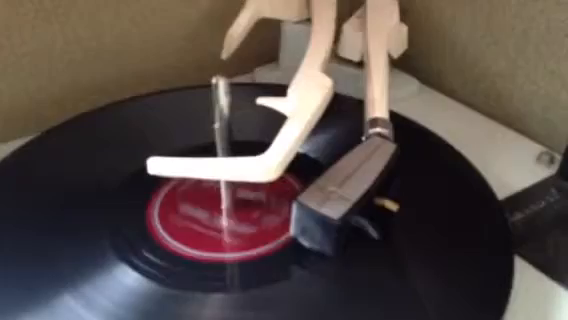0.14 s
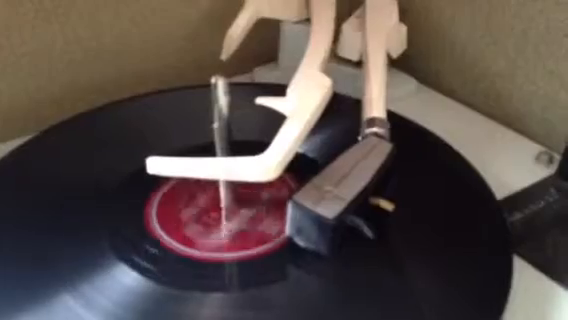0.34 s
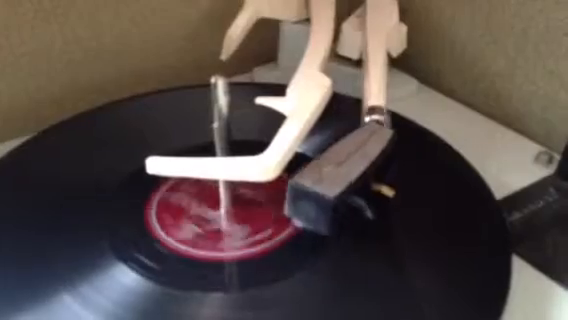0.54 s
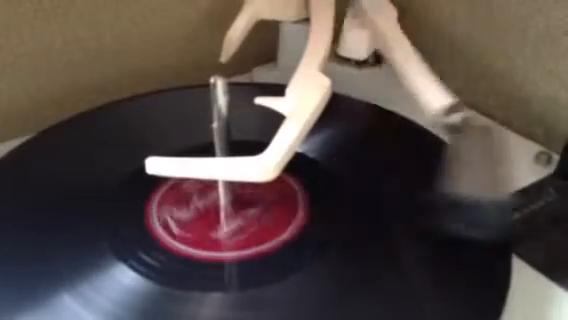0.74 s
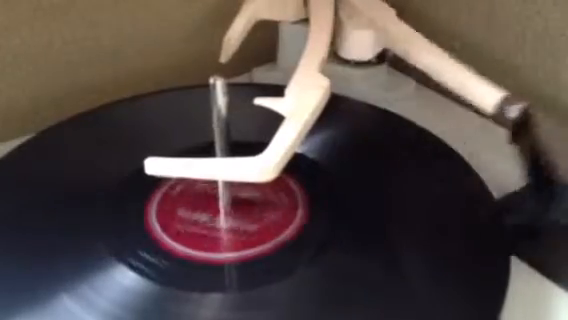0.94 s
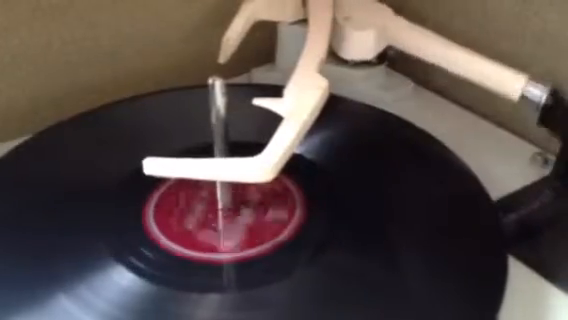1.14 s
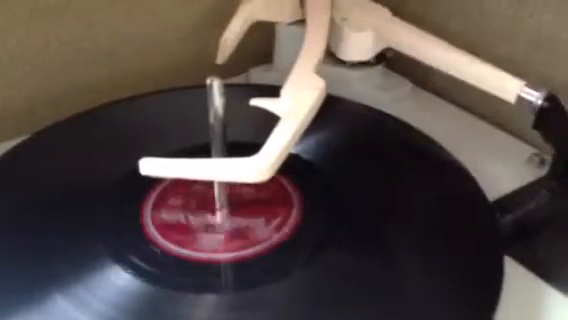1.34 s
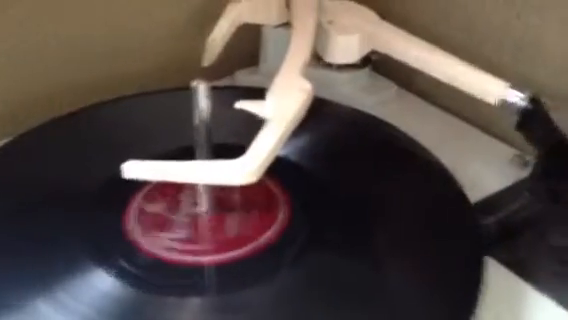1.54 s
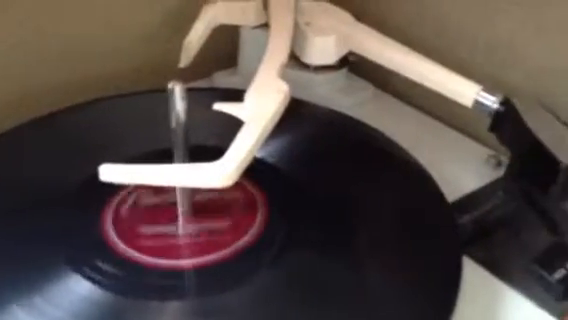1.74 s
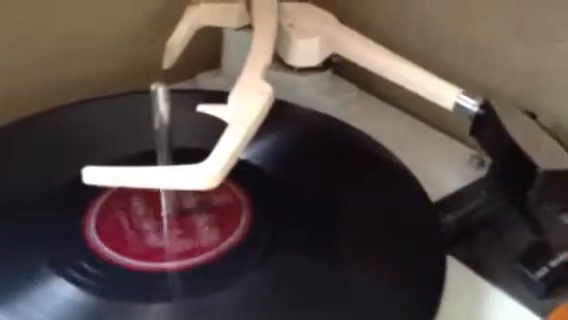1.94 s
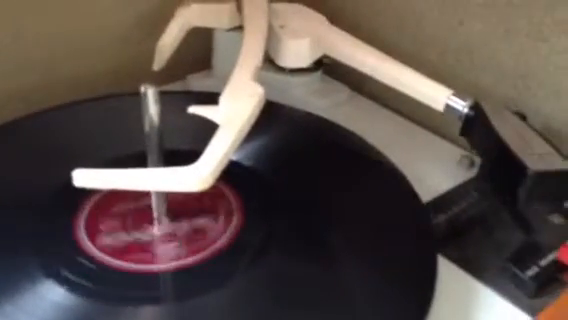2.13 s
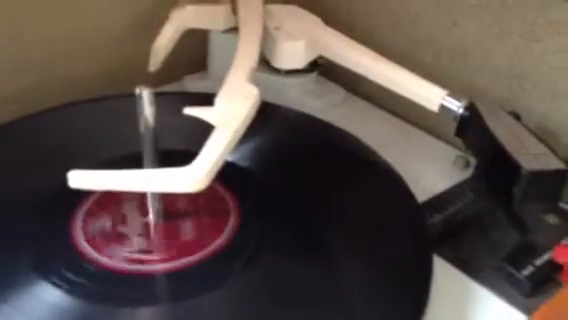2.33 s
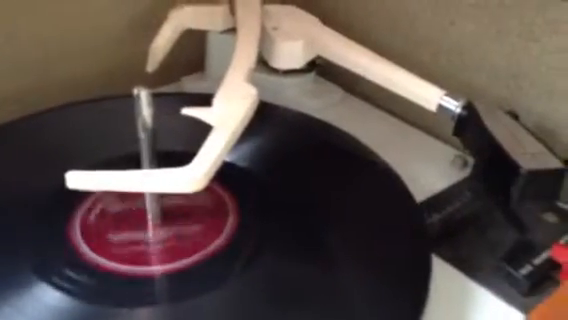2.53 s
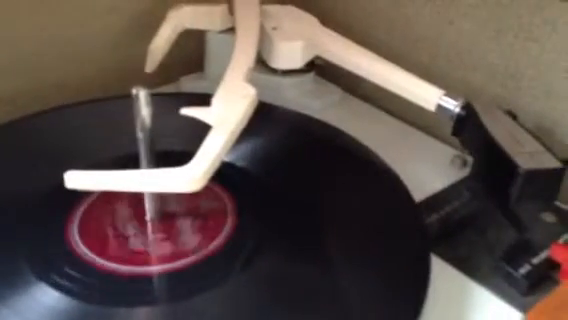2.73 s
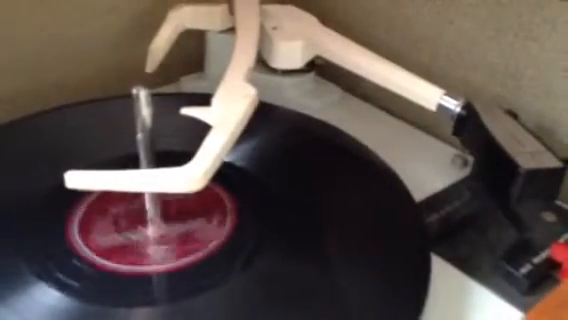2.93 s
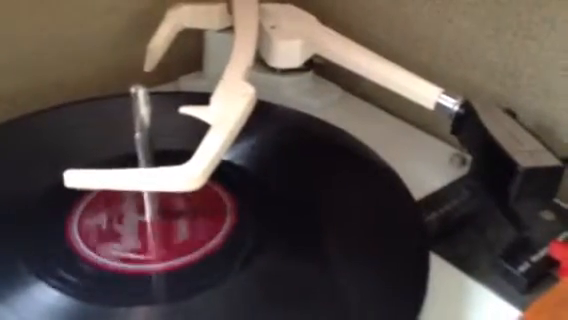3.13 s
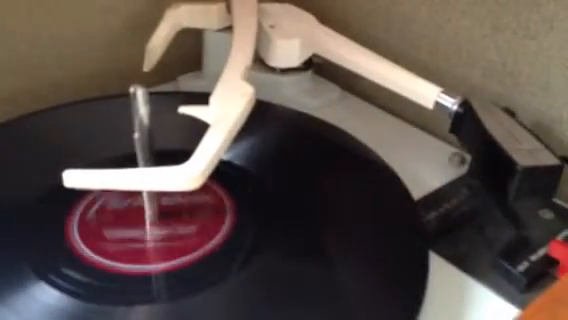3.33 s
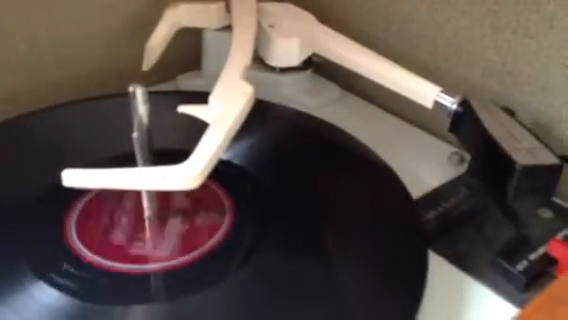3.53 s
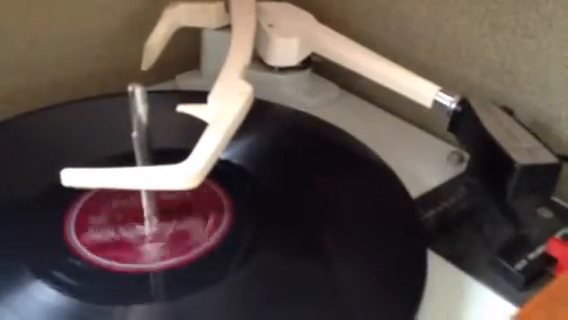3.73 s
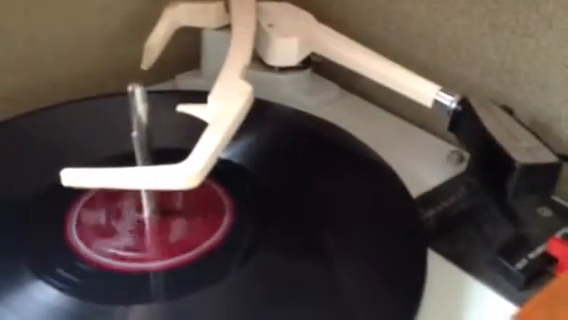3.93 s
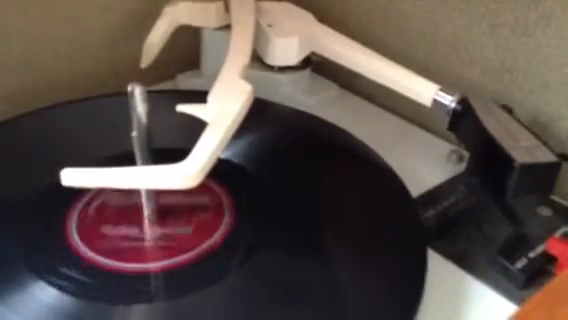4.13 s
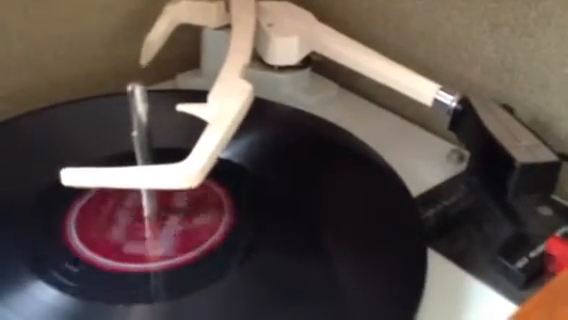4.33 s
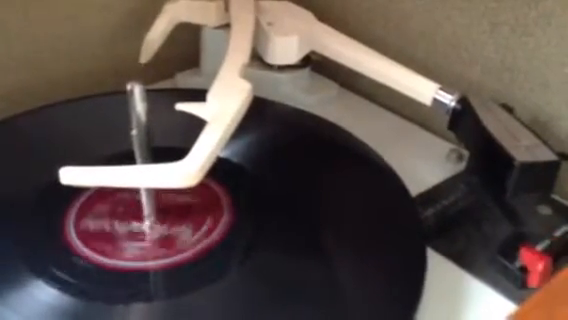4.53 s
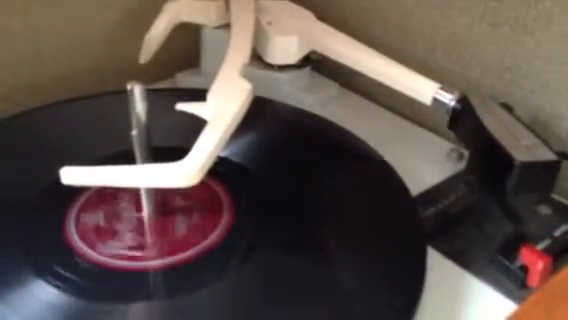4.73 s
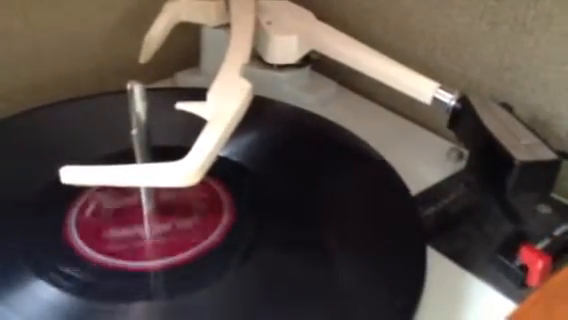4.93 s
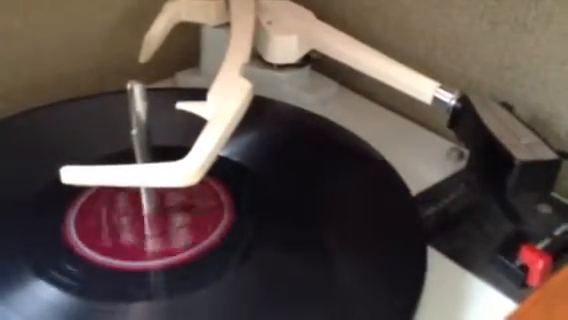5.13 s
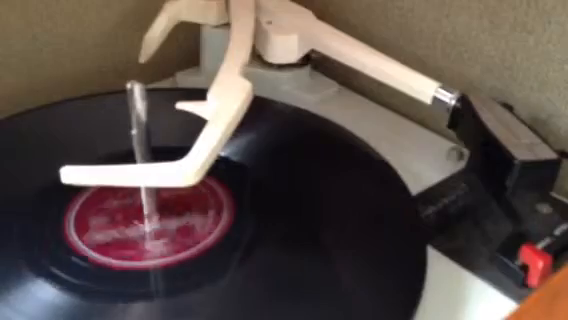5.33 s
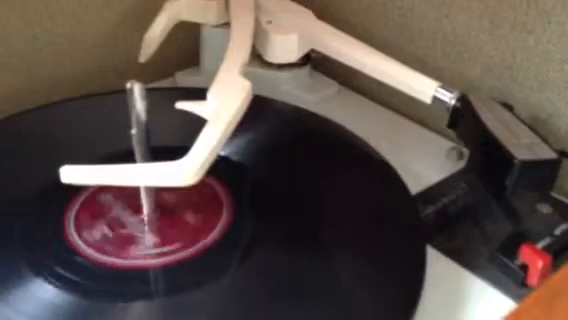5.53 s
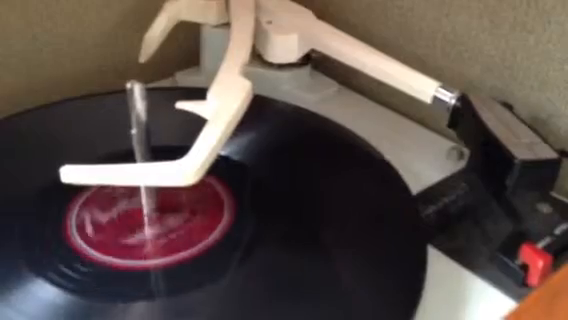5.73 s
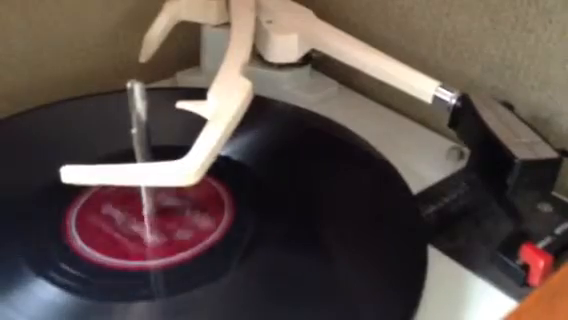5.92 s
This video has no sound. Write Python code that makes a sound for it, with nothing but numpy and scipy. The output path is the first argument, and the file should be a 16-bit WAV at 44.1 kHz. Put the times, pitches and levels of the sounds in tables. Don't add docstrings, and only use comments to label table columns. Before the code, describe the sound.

Heard from a close microphone with short, dry indoor reverberation: metal levers clunk and snap early on, with scraping linkage rattles just after one second. A long quiet stretch of rapid little gear ticks, dull thuds and motor whirr follows. Then a bright, heavy multiple clack, a rattling tail, and the platter coasting almost silently with soft rim brushes.

```python
import sys
import numpy as np
from scipy import signal
from scipy.fft import rfft, irfft
from scipy.io import wavfile
from scipy.ndimage import uniform_filter1d

SR = 44100
rng = np.random.default_rng(int(sys.argv[2]) if len(sys.argv) > 2 else 0)


def volts_from_db(level):
    exponent = np.asarray(level, float) / 20
    return 10 ** exponent


def materialize(psi):
    bounded = np.clip(np.atleast_2d(psi).T, -1, 1)
    quanta = np.round(bounded * 32767).astype(np.int16)
    wavfile.write(sys.argv[1], SR, quanta)


N = 267543
DRIVE_OFF_S = 4.5


def evened(x):
    return x / np.sqrt(np.mean(x ** 2) + 1e-20)


def read(points, hz):
    f, value = np.transpose(points)
    return np.interp(np.log(hz + 1), np.log(f + 1), value)


def bump(hz, centre_hz, octaves):
    return np.exp(-(np.log2((hz + 1) / centre_hz) / octaves) ** 2)


def bell(centre_s, width_s):
    return np.exp(-((np.arange(N) / SR - centre_s) / width_s) ** 2)


def slow(size):
    return evened(uniform_filter1d(uniform_filter1d(rng.standard_normal(N), size), size))


def add(mix, s, sound):
    part = mix[round(s * SR):][:len(sound)]
    part += sound[:len(part)]


def coloured(noise, colour_db):
    hz = np.fft.rfftfreq(len(noise), 1 / SR)
    return evened(irfft(rfft(noise) * volts_from_db(colour_db(hz)), len(noise)))


def resonate(x, hz, width):
    r = np.exp(-np.pi * width / SR)
    return 2 * signal.lfilter([1 - r], [1, -r * np.exp(2j * np.pi * hz / SR)], x).real


def narrow_band(noise, hz, width):
    return evened(resonate(resonate(noise, hz, width), hz, width))


def fuzzy(notes):
    noise = rng.standard_normal(N)
    return sum(volts_from_db(db) * narrow_band(noise, hz, width) for hz, width, db in notes)


def blow(size, db, colour_db, t60, rise_s):
    noise = rng.standard_normal(size)
    t = np.arange(size) / SR
    crack = 1 + 0.22 * np.exp(-t / 0.0023)
    grain = volts_from_db(2 * evened(uniform_filter1d(noise[::-1], 40)))
    envelope = volts_from_db(db - 60 * t / t60) * (1 - np.exp(-t / rise_s))
    return envelope * crack * grain * coloured(noise, colour_db)


# f/Hz, level/dB
KNOCK_COLOUR = [(25, -60.5), (60, -32.5), (200, -14.5), (350, -7.5), (900, 1), (1300, -3.5), (2500, -0.5),
                (4000, -0.5), (6000, 3.5), (8000, 1.5), (12000, 0), (15200, 0)]
# f/Hz, level/dB
BODY = [(700, -3), (1300, -22), (3000, -62)]
MIDDLE = [(500, -40), (1100, 1), (3800, 1.5), (6500, -12), (11000, -34.5)]
EDGE = [(2500, -47.5), (5000, -5.5), (6500, -3), (8200, -3), (11500, -1.5), (15000, -3.5)]
# t/s, peak level/dB, body level/dB re peak, edge level/dB re peak, struck part f/Hz
CLUNKS = [(0.1105, -30.5, -13, 3, 4080), (0.1553, -30.5, -6, -14, 1680), (0.242, -40, -7.5, -21, 2400),
          (0.358, -34, -11, -25, 3420), (0.39, -40.5, -34, -5.5, 6510), (0.721, -31, -16, -27, 1950),
          (0.8006, -37, -12.5, -17, 1830), (1.1074, -27.5, -9.5, -13, 1120),
          (1.2242, -22, -12.5, 1.7, 1576), (1.3489, -25.5, -15, -3.5, 4800), (1.3779, -29, -17, -9, 4850),
          (1.6373, -42, -5.5, -12.5, 2270), (2.677, -38, -9, -3, 2380), (3.8419, -37, -36, -3.5, 1888),
          (4.0217, -40, -17.5, -14, 2416), (4.4874, -18, -12, 2, 2750), (4.5175, -12, -12, 2, 2480),
          (4.5245, -16, -20.5, 2, 3960), (4.6348, -32, -9, -1.5, 5600)]
# t/s, peak level/dB, body level/dB re peak, edge level/dB re peak, struck part f/Hz
SNAPS = [
    (0.8268, -9.5, -38, -11, 3660),
    (0.8325, -18, -15.5, -4, 2370),
    (1.235, -30, -13, -11, 1200),
    (1.2652, -15.5, -19, -12, 3220),
    (1.3944, -36, -5.5, -3, 3950),
    (2.0322, -27.5, -13, -14.5, 3620),
    (2.039, -37.5, -29.5, -19, 1876),
    (4.5411, -20, -11, -10, 3422),
]
# t/s, peak level/dB, body level/dB re peak, edge level/dB re peak, struck part f/Hz
RATTLES = [
    (1.2025, -45, 4.5, -26, 1120),
    (1.2584, -16.5, -18.5, -6, 4262),
    (3.8655, -37.5, -38, -15, 3640),
    (4.5335, -20, -12.5, 6, 2440),
]
# t/s, peak level/dB, edge level/dB re peak, struck part f/Hz
TAPS = [(0.1057, -42.5, -3, 3750), (0.2187, -47.5, -7.5, 3640), (0.3291, -51, -10, 4400),
        (1.2775, -35, -25, 2400), (1.634, -46, -25, 2310), (1.5131, -55.5, -30, 2400),
        (1.5884, -48.5, -24.5, 3250), (1.644, -56.5, -13, 2280), (1.9703, -56.5, -17, 2444),
        (3.931, -49, -6.5, 2370), (3.9746, -51, -31, 2270), (4.3216, -50, -23.5, 3340),
        (4.3683, -56.5, -0.5, 1570), (4.4266, -48.5, -26, 2280), (4.4655, -60.5, 0, 2920),
        (4.4778, -45.5, -17, 3200)]


def levers():
    out = np.zeros(N)
    knocks = []
    for rows, t60 in ((CLUNKS, 0.078), (SNAPS, 0.036), (RATTLES, 0.11)):
        knocks += [row + (t60,) for row in rows]
    knocks += [(s, db, -6.5, edge_db, hz, 0.082) for s, db, edge_db, hz in TAPS]

    def body(hz):
        return read(KNOCK_COLOUR, hz) + read(BODY, hz)

    def edge(hz):
        return read(KNOCK_COLOUR, hz) + read(EDGE, hz)

    for s, db, body_db, edge_db, part_hz, t60 in knocks:
        def middle(hz):
            return read(KNOCK_COLOUR, hz) + 9 * bump(hz, part_hz, 0.098) + read(MIDDLE, hz)

        add(out, s, blow(8192, db, middle, 0.77 * t60, 0.0012))
        add(out, s, blow(8192, db + body_db - 0.5, body, 1.3 * t60, 0.0036))
        add(out, s, blow(8192, db + edge_db + 5.5, edge, 0.51 * t60, 0.0015))
    return out


# t/s, peak level/dB, centre f/Hz
TICKS = [(.3895, -32.5, 7400), (1.2240, -23, 9500), (1.2590, -15, 5000), (1.2662, -22, 3500),
         (1.3490, -26, 6000), (1.3782, -23.5, 6000), (1.3943, -37, 6000), (1.2028, -39, 1200),
         (2.0325, -29.5, 3700), (4.4880, -15, 8700), (4.5195, -7, 14000), (4.5415, -11, 11000),
         (3.9725, -52, 3200), (1.2612, -8, 3800), (1.1078, -26, 2300), (4.4895, -11, 3200),
         (.7215, -30, 2500), (.1115, -24, 5000), (.1575, -29, 2400), (2.678, -46, 1000)]


def ticks():
    out = np.zeros(N)
    for s, db, centre_hz in TICKS:
        add(out, s, blow(2048, db - 7.5, lambda hz: 30 * bump(hz, centre_hz, 1.3), 0.018, 0.0003))
    return out


# start t/s, end t/s, start level/dB, end level/dB, spread/octaves
SCRAPES = [(0.308, 0.356, -80, -57, 2.5), (0.832, 0.99, -35.5, -72.5, 2.16), (1.215, 1.227, -49, -36, 1.8),
           (1.235, 1.261, -42, -25, 2.45), (1.27, 1.347, -39, -50.5, 2.46), (1.396, 1.473, -53, -68, 2.7),
           (1.11, 1.2, -51, -71, 2), (4.502, 4.521, -31, -22.5, 4.7), (3.84, 3.896, -42, -43.5, 1.92),
           (3.887, 3.92, -46, -58, 2), (4.488, 4.526, -21.5, -27.5, 2.9), (4.543, 4.636, -25.5, -43.5, 4.1),
           (4.636, 4.805, -42, -86.5, 2.9), (4.658, 5.266, -71, -83, 1.7)]


def scrapes():
    out = np.zeros(N)
    for start, end, start_db, end_db, octaves in SCRAPES:
        size = round((end - start) * SR)
        n = np.arange(size)
        centre_hz = 2400 * 2 ** (0.32 * max(octaves - 2, 0))
        noise, jumps = rng.standard_normal((2, SR))
        grip = volts_from_db(1.6 * evened(uniform_filter1d(jumps, 60)))
        chatter = grip * coloured(noise, lambda hz: 30 * bump(hz, centre_hz, octaves))
        rise = np.minimum(n / (0.003 * SR), 1)
        fall = np.minimum(n[::-1] / (0.09 * size), 1)
        add(out, start, chatter[:size] * volts_from_db(np.linspace(start_db, end_db, size)) * rise * fall)
    return out


# t/s, peak level/dB, f/Hz
TEETH = [(0.53, -48.5, 1500), (0.5992, -47, 2750), (0.644, -53.5, 2530), (0.685, -49, 1620),
         (0.765, -44, 2530), (0.939, -45, 2410), (0.9783, -48, 2950), (1.022, -52, 1096),
         (1.449, -48.5, 2280), (1.556, -52, 2405), (1.687, -52, 2290), (1.737, -55.5, 1190),
         (1.8392, -56.5, 1052), (2.3468, -53.5, 1453), (2.4984, -54, 1860), (2.778, -60, 1400),
         (2.8882, -55.5, 1844), (2.938, -51, 2280), (3.045, -50, 1647), (3.13, -49, 2270),
         (3.4069, -55, 1020), (3.6346, -54.5, 3200), (3.7953, -58, 1846), (4.139, -51.5, 1855),
         (4.1828, -48.5, 1570), (4.295, -57.5, 1017), (4.3852, -53.5, 1880)]
# first tooth t/s, last tooth t/s, peak level/dB
MESHING = [
    (0.444, .5597, -53.5),
    (1.017, 1.063, -51),
    (4.108, 4.138, -53.5),
    (4.262, 4.2931, -51.5),
]
TOOTH_HZ = [1570, 1880, 1880, 2280, 1020]


def meshing():
    tooth_s, jitter_s, spread_db = 0.04, 0.002, 1.5
    soft = []
    for first, last, db in MESHING:
        for s in np.linspace(first, last, round((last - first) / tooth_s) + 1):
            if min(abs(s - hard[0]) for hard in TEETH) > tooth_s / 3:
                late, louder = rng.standard_normal(2)
                soft.append((s + jitter_s * late, db + spread_db * louder, rng.choice(TOOTH_HZ)))
    return soft


# t/s, peak level/dB, f/Hz
SOFT_TEETH = [(2.144, -54.5, 1000), (2.1888, -58, 1020), (2.2296, -56, 1860), (2.2715, -56, 1680),
              (2.3099, -57, 2270), (2.388, -55, 1870), (2.4285, -57.5, 1333), (2.544, -58.5, 1740),
              (2.5835, -58, 1870), (2.626, -55, 1840), (2.8545, -60, 1440), (2.9744, -59.5, 2060),
              (3.011, -55, 2030), (3.0587, -55.5, 1850), (3.0895, -52.5, 1885), (3.1687, -61, 2270),
              (3.21, -60, 2270), (3.2546, -57, 1850), (3.284, -58.5, 1470), (3.3246, -55, 1450),
              (3.3637, -55, 1470), (3.4436, -60, 1470), (3.483, -62.5, 1880), (3.519, -59, 1010),
              (3.563, -61, 1920), (3.5978, -57.5, 1880), (2.464, -60.5, 832), (3.674, -59.5, 853),
              (3.715, -62, 840), (3.752, -61.5, 1460), (2.09, -55.5, 2280), (2.74, -58.5, 2280),
              (2.815, -61.5, 1460)]
# f/Hz, level/dB
CAM = [(560, 5), (840, 6), (1460, 4), (1870, 5), (2280, 4), (3000, 6), (3800, 8)]
# t/s, peak level/dB, f/Hz, T60/s
BUMPS = [
    (0.548, -42.5, 130, 0.065),
    (1.838, -45.5, 377, 0.042),
    (2.182, -60, 398, 0.12),
    (3.041, -45.5, 435, 0.066),
    (3.048, -58, 353, 0.13),
    (3.427, -49.5, 288, 0.072),
    (5.06, -57, 121, 0.084),
    (5.193, -55, 356.5, 0.06),
    (5.478, -51.5, 205, 0.098),
]


def gear():
    out = np.zeros(N)
    teeth = TEETH + meshing() + [(s, db - 0.8, hz) for s, db, hz in SOFT_TEETH]
    for s, db, tooth_hz in teeth:
        def colour(hz):
            cam = sum(lift * bump(hz, part_hz, 0.09) for part_hz, lift in CAM)
            return 36 * bump(hz, 1500, 2.2) + 5 * bump(hz, tooth_hz, 0.2) + cam

        add(out, s, blow(4096, db - 3.5, colour, 0.06, 0.001))
    for s, db, bump_hz, t60 in BUMPS:
        add(out, s, blow(8192, db - 0.5, lambda hz: 40 * bump(hz, bump_hz, 0.99), t60, 0.0056))
    return out


# t/s, f/Hz, level/dB, T60/s
RINGS = [(.1108, 4020, -23, .018), (.111, 5200, -36, .02), (.111, 6420, -32.5, .02), (.111, 420, -49, .05),
         (.155, 1854, -34.5, .04), (.156, 4040, -39, .035), (.157, 3250, -34, .02), (.158, 726, -47, .09),
         (.219, 3770, -58, .05), (.244, 1135, -44.5, .04), (.358, 2207, -42, .05), (.359, 5300, -51, .025),
         (.390, 3800, -52, .04), (.391, 6210, -35, .035), (.393, 6200, -77, .3), (.359, 3480, -41.5, .04),
         (1.514, 2324, -51.5, .06), (.8268, 6094, -13.5, .022), (.832, 6100, -17, .025),
         (.8268, 3140, -19.5, .012), (.8272, 2180, -17, .012), (.8275, 10400, -28.5, .015),
         (.8275, 13500, -30.5, .012), (.832, 3940, -26, .035), (.828, 6230, -54, .32),
         (.832, 2362, -23, .05), (1.109, 1202, -45.5, .2), (1.109, 1014, -39.5, .08),
         (1.110, 484, -45, .09), (1.110, 300.6, -41, .11), (1.110, 211, -47.5, .12),
         (1.204, 1173, -46, .15), (1.236, 1202, -34.5, .11), (1.358, 1200, -38.5, .06),
         (2.038, 1760, -53.5, .12), (2.034, 350, -46, 0.069), (2.68, 2330, -53, .05),
         (4.534, 11610, -22.5, 0.058), (4.534, 9700, -24, 0.043), (3.931, 2246, -53.5, 0.094),
         (3.931, 3670, -56, 0.064), (.83, 270, -51.5, .2), (4.519, 447, -48, .68), (4.519, 894, -58, .6),
         (4.519, 1206, -65, 1.25), (4.513, 70, -42, .07), (4.519, 353, -32.5, .09), (.112, 229, -45, .12),
         (.156, 139, -51.5, .13),
         (4.636, 520, -38.5, 0.023), (2.678, 626, -50.5, 0.039), (3.408, 756, -59, 0.031),
         (8, 1000, -70.5, .08), (1.108, 3300, -34, .02), (.115, 3900, -28, .018), (1.349, 5100, -32.5, .02),
         (.112, 1100, -41, 0.047), (.157, 1050, -41.5, 0.046), (1.11, 700, -44, .06),
         (4.2, 3700, -64.5, .03), (3.797, 3800, -66, .03), (1.8, 383, -62, .05)]
# f/Hz, level/dB, T60/s
PLATTER = [(2230, -70, 1.5), (2401, -66, 1.2), (2500, -66, 1.1), (2830, -70, 1.2), (1760, -67, .9),
           (1620, -75, 2.1), (3500, -75, 1.5), (4070, -78, 1.6), (690, -66, 0.95), (4505, -79.5, 1.5)]


def rings():
    out, t = np.zeros(N), np.arange(SR) / SR
    for s, hz, db, t60 in RINGS + [(DRIVE_OFF_S, *mode) for mode in PLATTER]:
        phase, apart = rng.random(2)
        twin_hz = hz * (0.985 + 0.03 * apart)
        twin = 0.26 / (1 + 4 * t60) * np.sin(2 * np.pi * (twin_hz * t + phase))
        pair = np.sin(2 * np.pi * hz * t) + twin
        joints = evened(uniform_filter1d(rng.standard_normal(SR), round(300 + 3000 * t60 ** 2)))
        waver_db = 3.2 / (1 + t60) * joints * np.minimum(t / 0.006, 1)
        decay = volts_from_db(db + 7.5 - 60 * t / t60 + waver_db)
        add(out, s, decay * (1 - np.exp(-t / 0.0011)) * pair)
    return out


# f/Hz, level/dB, T60/s
DECK = [(310, -17, 0.098), (453, -24, 0.25), (842, -32, 0.11), (1107, -28, 0.11), (1600, -25.5, 0.039),
        (1834, -29, 0.06), (2290, -27, 0.15), (2456, -26.5, 0.14), (2750, -34, 0.39), (3200, -31, 0.025)]


def deck(x):
    return sum(volts_from_db(db) * resonate(x, hz, 5.6 / t60) * np.sqrt(t60 * 1500) for hz, db, t60 in DECK)


# f/Hz, T60/s
ROOM = [(200, 0.097), (700, 0.49), (2000, 0.21), (5000, 0.098), (10000, 0.11), (16000, 0.11)]


def room(x):
    hz, t, z = signal.stft(rng.standard_normal((3, SR // 2)), SR, nperseg=128)
    decay = volts_from_db(-60 * t / read(ROOM, hz)[:, None])
    tails = signal.istft(z * decay, SR, nperseg=128)[1]
    tails = tails * np.minimum(np.arange(tails.shape[1]) / (0.0012 * SR), 1)
    turn = np.arange(N) / SR * 2 * np.pi * 7 + np.arange(3)[:, None] * np.pi / 3
    fed = x * np.sqrt(2 / 3) * np.cos(turn)
    return signal.fftconvolve(fed, tails / np.linalg.norm(tails[0]), axes=1)[:, :N].sum(0)


# f/Hz, width/Hz, level/dB
RIM = [(4080, 48, -11), (4640, 47, -9), (5328, 70, -4.5), (6120, 64, -1.5), (6670, 50, -10),
       (7740, 48, -14), (8170, 140, -12.5), (8800, 47, -4), (9700, 100, -2.5), (10770, 250, -3.5),
       (12060, 83, -0.5), (12800, 85, -21), (12600, 71, -12), (14400, 190, -7)]
# start t/s, end t/s, start level/dB, end level/dB
BRUSHES = [
    (4.855, 5.278, -68, -72.5),
    (5.495, 5.76, -63.5, -101),
    (5.915, 6.202, -68.5, -76),
]
BRUSH_RISE_S = [0.033, 0.017, 0.022]


def rim():
    grip_db = 1.3 * evened(uniform_filter1d(rng.standard_normal(N), 500))
    rub = rng.standard_normal(N) * volts_from_db(grip_db)
    song = sum(volts_from_db(db) * narrow_band(rub, hz, 1.6 * width) for hz, width, db in RIM)
    t = np.arange(N) / SR
    touch = volts_from_db(-84 + 0.98 * t) * np.clip((DRIVE_OFF_S - t) / 0.2 + 1, 0, 1)
    for (start, end, start_db, end_db), rise_s in zip(BRUSHES, BRUSH_RISE_S):
        window = np.clip((t - start) / rise_s, 0, 1) * np.clip((end - t) / 0.021, 0, 1)
        touch = touch + window * volts_from_db(np.interp(t, [start, end], [start_db, end_db]))
    return touch * evened(song)


# f/Hz, spectral level/dB per Hz
GROOVE = [(65, -43), (110, -10), (219, -1.5), (394, -15.5), (754, -17.5), (1080, -29.5), (2060, -23),
          (3500, -23.5), (4400, -20), (5280, -14.5), (6500, -17), (8000, -28), (12500, -22), (14700, -14)]
# f/Hz, width/Hz, level/dB
SQUEAL = [(4400, 150, -69), (6220, 150, -70), (5300, 200, -68)]


def needle():
    lift_s = 0.552
    down = np.clip((lift_s - np.arange(N) / SR) / 0.01, 0, 1)
    hiss = coloured(rng.standard_normal(N), lambda hz: read(GROOVE, hz))
    squeal = (bell(0.304, 0.028) + 0.3 * down) * fuzzy(SQUEAL)
    skid_db = 5.5 * bell(0.342, 0.044)
    return down * volts_from_db(-57 + skid_db) * hiss + squeal


# f/Hz, spectral level/dB per Hz
WORKS = [(88, -39.5), (150, -10), (328, 2.5), (381, -0.5), (457, -1), (861, -3), (967, -12.5),
         (1880, -10.5), (2040, -21.5), (2300, -4.5), (2620, -16), (3850, -15), (8000, -29.5),
         (10400, -54.5), (17600, -120)]
# t/s, level/dB re idling
LOAD = [(0.0, -49), (0.15, 19), (0.27, 2), (1.15, 5.5), (1.28, 13), (1.42, 8), (1.6, 2), (2.45, -1.5),
        (3.11, 0), (3.99, 1.5), (4.31, 0.5), (4.56, 6), (4.76, -1), (5.51, -5), (5.83, -10.5), (6.07, -4.5)]


def load_db():
    s, db = np.transpose(LOAD)
    return np.interp(np.arange(N) / SR, s, db)


def works():
    flutter_db = 2.2 * evened(uniform_filter1d(rng.standard_normal(N), 900))
    whirr = coloured(rng.standard_normal(N), lambda hz: read(WORKS, hz))
    return volts_from_db(-66.5 + load_db() + flutter_db) * whirr


# f/Hz, width/Hz, level/dB
SHAFT = [(2290, 60, -83), (3850, 120, -89)]
# f/Hz, width/Hz, level/dB
SHIMMER = [(2540, 30, -80), (2400, 30.04, -81), (2778, 80, -84)]


def shafts():
    running = np.clip((DRIVE_OFF_S - np.arange(N) / SR) / 0.05, 0, 1)
    return running * fuzzy(SHAFT) + bell(4.95, 0.2) * fuzzy(SHIMMER)


# centre t/s, width/s, level/dB
HUM_SAGS = [
    (1.3, 0.092, 2),
    (1.618, 0.051, -15),
    (1.898, 0.14, -9.5),
    (4.62, .07, -9),
    (4.851, .12, -8.5),
    (5.101, 0.059, 6.5),
    (5.9, 0.33, -1),
]


def motor():
    hum_hz = 100.3 + 0.7 * slow(3000)
    phase = 2 * np.pi * np.cumsum(hum_hz) / SR
    sag_db = sum(db * bell(s, width) for s, width, db in HUM_SAGS)
    level_db = -67.5 + 1.9 * slow(2500) + sag_db
    return np.sqrt(2) * volts_from_db(level_db) * (np.sin(phase) + volts_from_db(-14) * np.sin(2 * phase))


# f/Hz, width/Hz, level/dB
DRONE = [(119, 14, -70.5), (205, 20, -75.5), (273, 35, -73.5), (360, 40, -78)]


def rumble():
    lumps_db = 3.5 * np.clip(evened(uniform_filter1d(rng.standard_normal(N), 2500)), -2, 1.6)
    driven = volts_from_db(-76 + 0.71 * load_db())
    coasting = volts_from_db(-71.5) * bell(6.73, 0.4)
    low = coloured(rng.standard_normal(N), lambda hz: 40 * bump(hz, 230, 3.4))
    return bell(5.5, 0.56) * fuzzy(DRONE) + (driven + coasting) * volts_from_db(-2.5 + lumps_db) * low


# f/Hz, spectral level/dB per Hz
AIR = [(20, -31), (31, -28.5), (42, -5.5), (60, -11.5), (85, -11.5), (100, -6.5), (120, -12.5),
       (170, -21.5), (270, -17), (500, -29.5), (1100, -23.5), (2000, -34.5), (4000, -35.5), (15000, -39)]


def air():
    return volts_from_db(-70.5) * coloured(rng.standard_normal(N), lambda hz: read(AIR, hz))


def scene():
    blows = levers() + ticks() + scrapes() + gear()
    blows = blows + deck(blows) + rings()
    steady = rim() + needle() + works() + shafts() + motor() + rumble() + air()
    return (blows + volts_from_db(-15) * room(blows) + steady)[None]


def top_cut(x):
    return signal.sosfilt(signal.butter(12, 16480, fs=SR, output="sos"), x)


def record(dry):
    power_db = 10 * np.log10(abs(uniform_filter1d((dry ** 2).mean(0), 800)) + 1e-12)
    fall_db = np.arange(N) * 7.7 / SR
    held_peak_db = np.maximum.accumulate(power_db + fall_db) - fall_db
    over_db = np.maximum(held_peak_db + 21.5, 0)
    held = dry / volts_from_db(0.41 * uniform_filter1d(over_db, 1500))
    held = signal.sosfilt(signal.butter(2, 30, "high", fs=SR, output="sos"), held)
    band_edge = signal.firwin(301, 15450, fs=SR)
    dull = signal.oaconvolve(held, band_edge[None], "same")
    mix = np.tanh(dull + volts_from_db(-40) * (held - dull))
    return top_cut(mix)


dry = scene()
out = record(dry)
materialize(out)
```